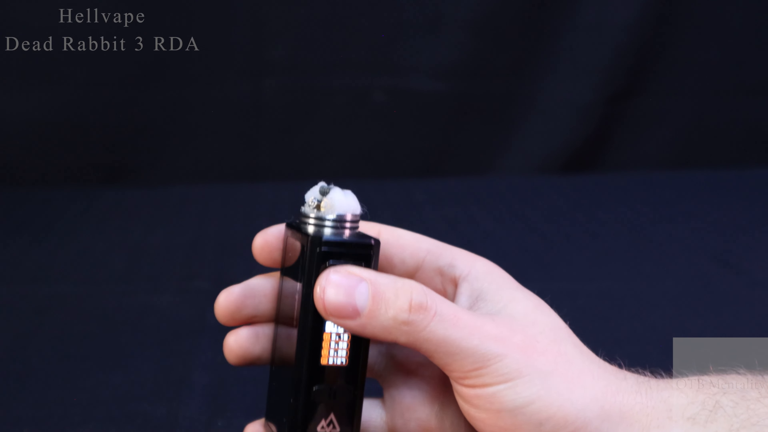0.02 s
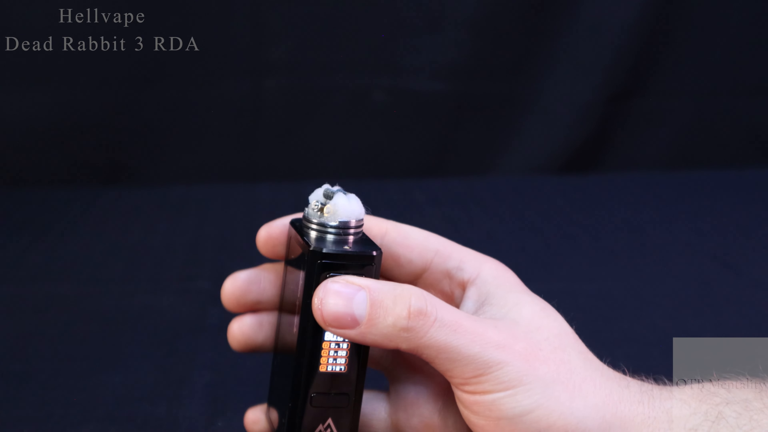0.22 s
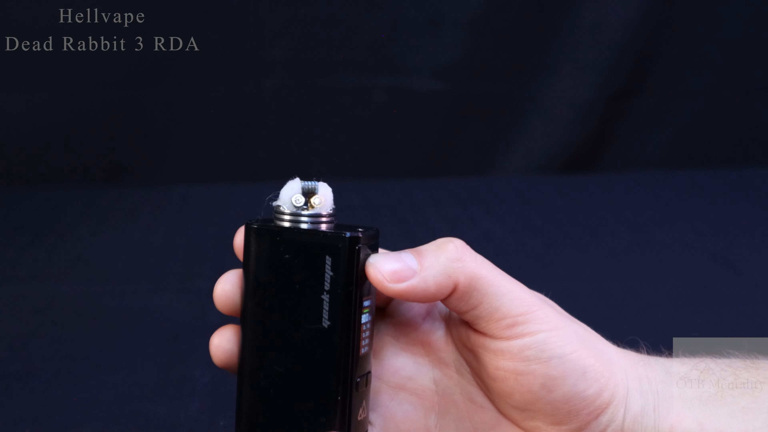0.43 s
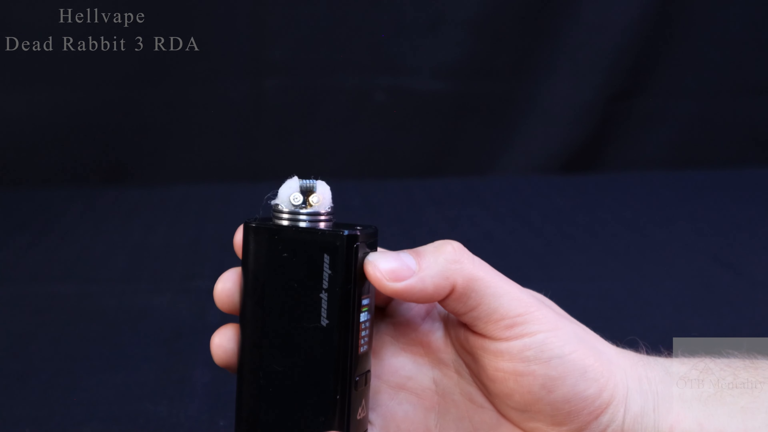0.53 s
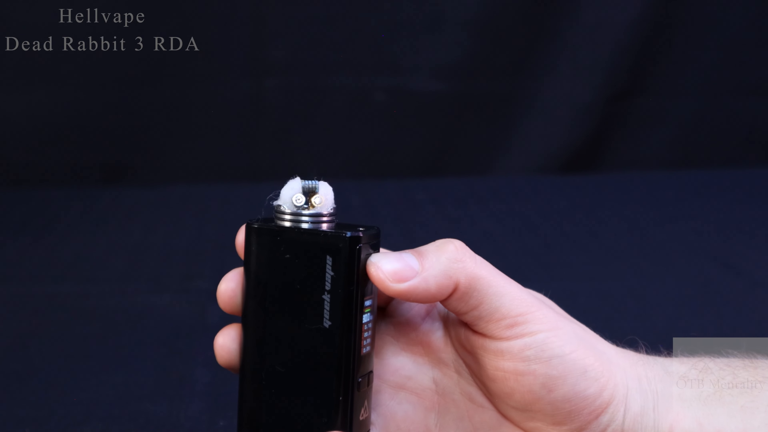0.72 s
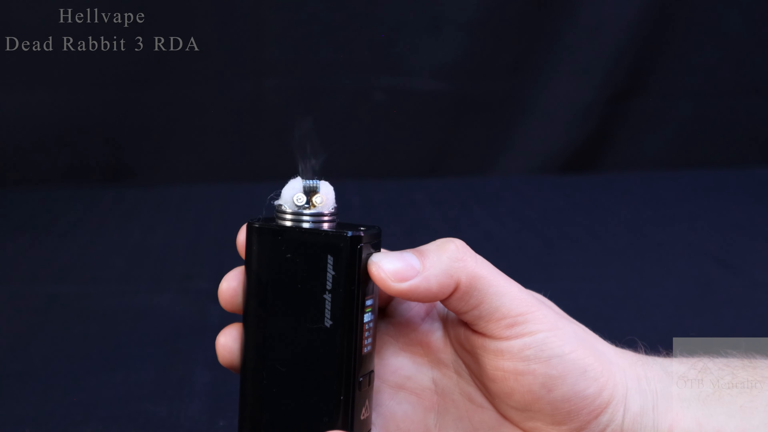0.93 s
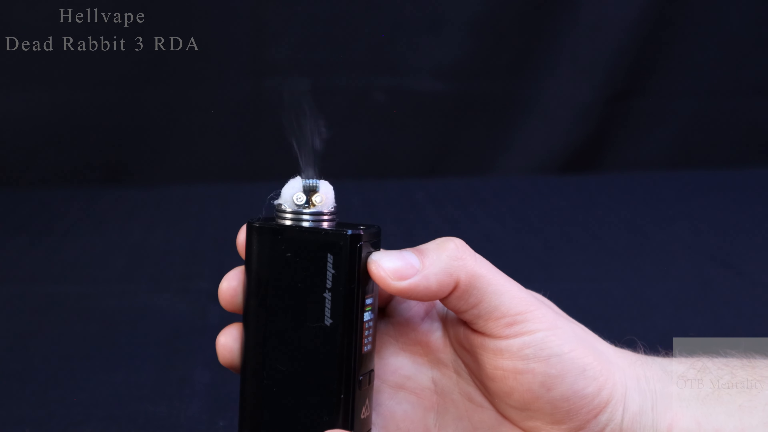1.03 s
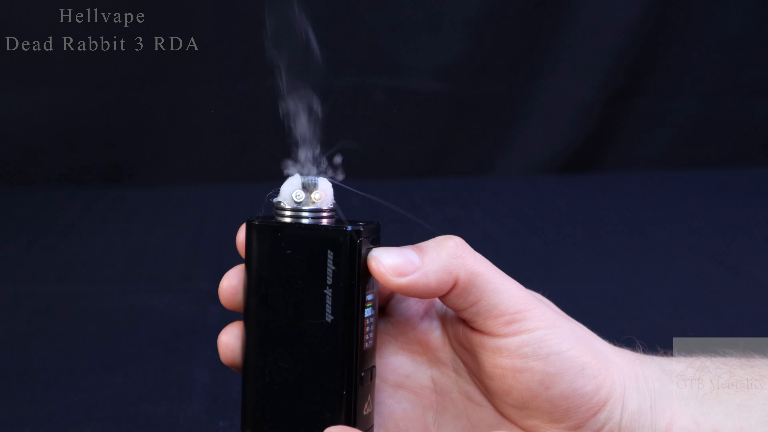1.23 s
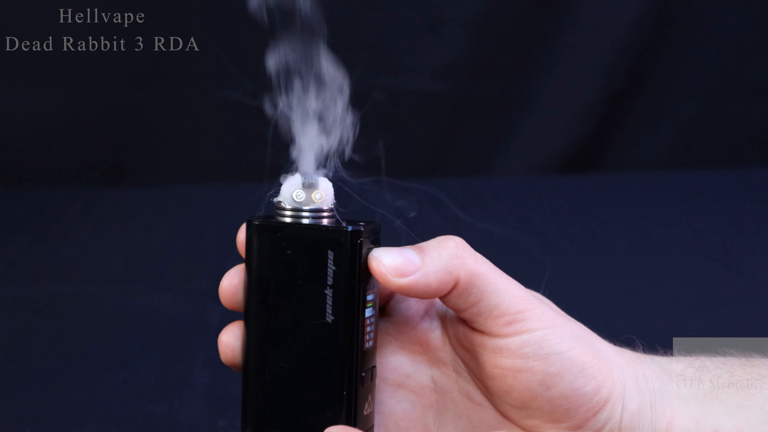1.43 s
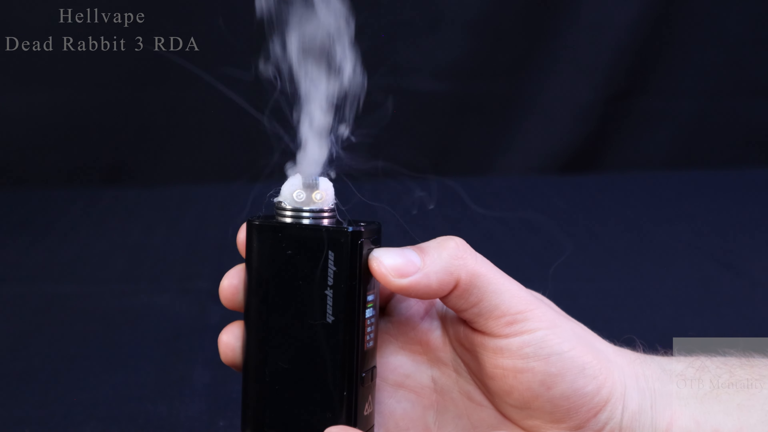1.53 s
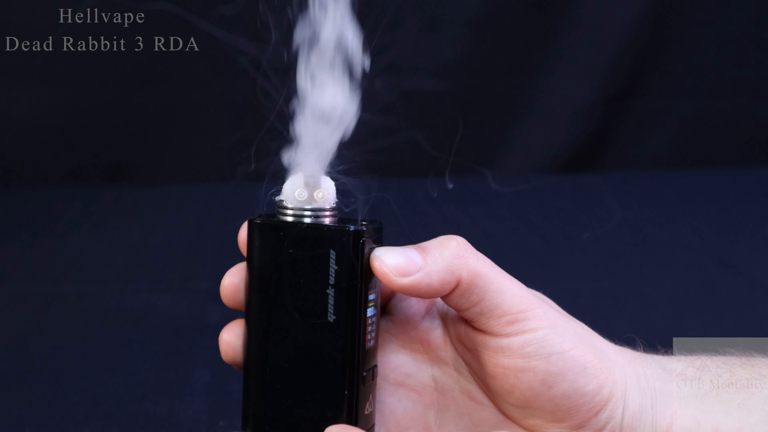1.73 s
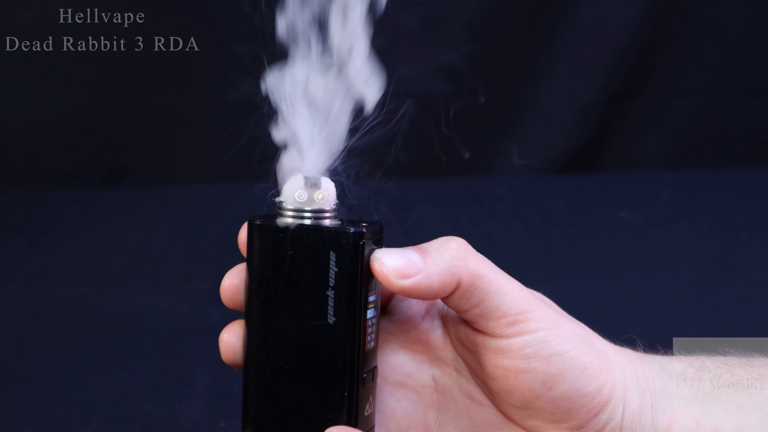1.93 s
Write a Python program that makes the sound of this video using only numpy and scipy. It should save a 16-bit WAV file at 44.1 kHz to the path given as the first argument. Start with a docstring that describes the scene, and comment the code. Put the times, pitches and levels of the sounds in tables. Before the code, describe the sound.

A vaping device's wet coils sizzle, close-miked in a quiet room. Dull, low handling thumps come in the first 0.3 seconds, strongest near 0.2, with faint skin rubbing. At 0.48 a tiny double button click sounds with a soft bump. A very faint, high simmer follows, rising into sizzle from 0.8, thickening after 1.15 and becoming a fuller, bright, boiling hiss until 2.0. Faint low rumble lies underneath.

```python
"""Vaping device handled and fired close to a microphone

Four overlapping swarms of coloured bubble pops step the wet coils from simmer through sizzle and seethe to boil.
Before that the hand gives damped low thumps and a noise rub; two short filtered bursts click the fire button.
A slow sine flutter, grip rumble and steady room noise lie underneath.
"""
import sys
import numpy as np
from scipy import signal
from scipy.fft import rfft, irfft
from scipy.io import wavfile
from scipy.ndimage import uniform_filter1d

SR = 44100
rng = np.random.default_rng(int(sys.argv[2]) if len(sys.argv) > 2 else 0)


def bounce(signal):
    """Save signal as a 16-bit WAV file at the path given by the first command-line argument."""
    frames = np.transpose(np.atleast_2d(signal))
    limited = np.clip(frames, -1, 1)
    pcm = np.round(limited * 32767).astype(np.int16)
    wavfile.write(sys.argv[1], SR, pcm)


N = 88200
T = np.arange(N) / SR


def undb(db):
    """Decibels to gain."""
    return 10 ** (np.asarray(db) / 20)


def unit(x):
    """Scale to rms 1."""
    return x / np.sqrt(np.mean(x ** 2) + 1e-20)


def curve(rows):
    """Gain over time from (t/s, level/dB) points."""
    return undb(np.interp(T, *np.array(rows).T))


def colour(x, points):
    """Minimum-phase filter through (f/Hz, level/dB) points, 30 dB/octave down outside them, floor -80 dB."""
    hz, db = np.array(points).T
    octave = np.log2(np.maximum(np.fft.rfftfreq(2 * N, 1 / SR), 1))
    edge = np.log2(np.sort(hz))
    outside = np.maximum(edge[0] - octave, 0) + np.maximum(octave - edge[-1], 0)
    shape_db = np.maximum(np.interp(octave, edge, db) - 30 * outside, -80)
    # fold the cepstrum onto positive time: causal response
    cepstrum = irfft(np.log(undb(shape_db)))
    cepstrum[1:N] *= 2
    cepstrum[N + 1:] = 0
    response = np.exp(rfft(cepstrum))
    return irfft(rfft(x, 2 * N) * response)[:N]


def noise(points):
    """Coloured Gaussian noise of rms 1."""
    return unit(colour(rng.standard_normal(N), points))


def walk(rate_hz):
    """Random steps at rate_hz, smoothed twice, rms 1."""
    k = int(SR / rate_hz)
    steps = np.repeat(rng.standard_normal(N // k + 1), k)
    return unit(uniform_filter1d(uniform_filter1d(steps, k), k)[:N])


def ramp(u):
    """Smooth step from 0 to 1."""
    return np.sin(np.pi / 2 * np.clip(u, 0, 1)) ** 2


# boiling stages: start t/s, takeover/s, level at end of takeover/dB, pop rate/(1/s), size spread/dB
STAGES = [(0.48, 0.11, -69, 13000, 2), (0.80, 0.25, -59.5, 10700, 3), (1.14, 0.32, -52, 15000, 2.6),
          (1.46, 0.29, -50, 14600, 2)]
# stage spectra: f/Hz, relative density/(dB per Hz)
SIMMER_COLOUR = [(6800, -14.5), (7900, -5), (9000, -4.5), (10200, -4), (10900, -10), (12600, -9),
                 (14100, -14), (15000, -12), (15700, -5)]
SIZZLE_COLOUR = [(1300, -14), (2300, -10.5), (2850, -17.5), (3600, -5), (4800, -10), (5700, -5.5),
                 (6800, -7.5), (7600, 1), (8500, 1.5), (9000, -3.5), (9800, -2.5), (10700, -7), (13500, -6),
                 (14400, -10.5), (15000, -6), (15700, -6.5)]
SEETHE_COLOUR = [(300, -10.5), (1000, -14), (2000, -7), (2950, -14.5), (3600, -7.5), (4800, -13),
                 (5800, -6.5), (6800, -10), (7700, -1), (8500, 0), (8950, -6), (9700, -2.5), (10300, -5.5),
                 (10700, -10.5), (13000, -8.5), (14200, -15), (15700, -10.5)]
BOIL_COLOUR = [(300, -7.5), (900, -10.5), (1200, -6.5), (2000, -2.5), (3000, -11), (3550, -1.5),
               (4800, -9.5), (5900, -3), (6700, -7), (7800, 2), (8500, 0), (8950, -2.5), (9600, -2.5),
               (10300, -5), (10700, -9), (12900, -8), (14200, -13), (15700, -13.5)]
# brief boosts of the boiling: t/s, width/s, boost/dB
SPURTS = [(0.99, 0.02, 1.5), (1.014, 0.0041, 4), (1.975, 0.053, 0.5)]
GROWTH_DB_PER_S = 8
FLICKER_DB, FLICKER_HZ = 0.06, 25.5


def coils():
    """Bubbles burst as random-sign impulses; each hotter stage takes over, louder, with its own spectrum."""
    out = np.zeros(N)
    colours = (SIMMER_COLOUR, SIZZLE_COLOUR, SEETHE_COLOUR, BOIL_COLOUR)
    reached = [ramp((T - start) / takeover) for start, takeover, *_ in STAGES] + [0]
    for k, points in enumerate(colours):
        start, takeover, db, pops_per_s, spread_db = STAGES[k]
        share = np.sqrt(reached[k] * (1 - reached[k + 1]))
        sizes = undb(spread_db * np.minimum(rng.exponential(size=N), 6))
        bursts = rng.random(N) < pops_per_s / SR
        pops = bursts * sizes * rng.choice([-1, 1], N)
        level = undb(db + GROWTH_DB_PER_S * (T - start - takeover))
        out += level * share * unit(colour(pops, points))
    spurts_db = sum(db * np.exp(-((T - at) / width) ** 2) for at, width, db in SPURTS)
    return out * undb(spurts_db + FLICKER_DB * walk(FLICKER_HZ))


REFLECTION_DB, REFLECTION_DECAY_S, REFLECTION_DELAY_S = -8, 0.011, 0.0037


def reflect(x):
    """Table and walls return a short, decaying random scatter of echoes that combs the hiss."""
    age = T[:N // 16]
    echoes = rng.standard_normal(len(age)) * np.exp(-age / REFLECTION_DECAY_S) * (age > REFLECTION_DELAY_S)
    echoes /= np.linalg.norm(echoes)
    return x + undb(REFLECTION_DB) * signal.fftconvolve(x, echoes)[:N]


# handling thumps: t/s, f/Hz, level/dB, attack/s, hold/s, decay time/s, scuff share
THUMPS = [(0.042, 76.4, -26, 0.01, 0.0012, 0.011, 0.21), (0.078, 32.2, -38.5, 0.0042, 0.051, .02, 0.12),
          (0.136, 94, -39.5, 0.014, 0.0079, 0.0072, 0.55),
          (0.183, 125.5, -25.5, 0.0096, 0.0014, 0.0074, .08),
          (0.2029, 63.7, -11, .008, 0.0043, .026, 0.037), (0.265, 89.7, -39.5, 0.0056, 0.064, 0.016, 0.37),
          (0.4807, 82, -34.5, 0.0094, 0.0037, 0.0051, 0.35), (0.503, 142, -51, .008, 0.017, 0.042, 0.42),
          (0.514, 86.6, -48, 0.0078, 0.069, 0.043, 0.28)]
# overtones: multiple of f, level re fundamental/dB
THUMP_OVERTONES = [(2.93, -39), (5.9, -52.5)]
# scuff spectrum: f/Hz, relative density/(dB per Hz)
SCUFF_COLOUR = [(20, -5), (60, 4), (120, 9), (165, -2), (205, -18.5), (250, -46)]
THUMP_DAMPED_S = 0.055  # after the hold; fade-out fills the second half


def thumps():
    """Each bump of the hand starts a low, scuffed ring that the grip soon damps."""
    out = np.zeros(N)
    scuff = noise(SCUFF_COLOUR)
    for start, hz, db, attack, hold, decay, rough in THUMPS:
        age = np.maximum(T - start, 0)
        late = np.maximum(age - attack - hold, 0)
        grip = 1 - ramp(2 * late / THUMP_DAMPED_S - 1)
        env = ramp(age / attack) * np.exp(-late / decay) * grip
        phase = 2 * np.pi * hz * age
        overtones = sum(undb(part_db) * np.sin(multiple * phase) for multiple, part_db in THUMP_OVERTONES)
        out -= undb(db) * env * (np.sin(phase) + overtones + rough * scuff)
    return out


# button clicks: t/s, total energy level/dB
CLICKS = [(0.4748, -28.5), (0.4775, -29.5)]
# click spectrum: f/Hz, relative density/(dB per Hz)
CLICK_COLOUR = [(250, -6), (500, 2.5), (1000, 1.5), (1400, 0.5), (2400, -5), (2950, -11), (3500, -4),
                (4200, -9), (5500, -17), (6100, -23), (6800, -16), (9000, -22), (15000, -33)]
CLICK_RING_S, CLICK_RING_DB = 0.0013, 3.5  # levels re the impulse, before colouring
ECHO_DELAY_S, ECHO_DECAY_S, ECHO_DB = 0.0048, 0.06, 2


def noise_burst(start, decay):
    """Exponentially decaying noise of unit energy."""
    burst = rng.standard_normal(N) * (T >= start) * np.exp(-np.maximum(T - start, 0) / decay)
    return unit(burst) / np.sqrt(N)


def button():
    """The switch snaps and seats: impulse, short case ring, delayed room tail."""
    out = np.zeros(N)
    for start, db in CLICKS:
        ring = undb(CLICK_RING_DB) * noise_burst(start, CLICK_RING_S)
        echo = undb(ECHO_DB) * noise_burst(start + ECHO_DELAY_S, ECHO_DECAY_S)
        snap = ring + echo
        snap[int(start * SR)] += 1
        out += undb(db) * unit(colour(snap, CLICK_COLOUR)) / np.sqrt(N)
    return out


# case modes: f/Hz, level/dB, decay time/s
CASE_MODES = [(600, -44.5, 0.0013), (980, -46.5, 0.0026), (1340, -43.5, 0.0018), (1900, -57, 0.0032),
              (2300, -48.5, 0.0019), (3420, -47.5, 0.0022), (3750, -53, 0.0032), (5200, -55, 0.00056)]


def case_ring():
    """The first snap of the button excites decaying sine modes of the case."""
    age = np.maximum(T - CLICKS[0][0], 0)
    return sum(undb(db) * np.exp(-age / decay) * np.sin(2 * np.pi * hz * age) for hz, db, decay in CASE_MODES)


# skin rub: t/s, level/dB
RUB = [(0, -62.5), (0.07, -69), (0.125, -63.5), (0.23, -68), (0.33, -76.5)]
# rub spectrum: f/Hz, relative density/(dB per Hz)
RUB_COLOUR = [(240, -35), (400, -10), (531, -4.5), (683, -22), (736, -11.5), (1050, -11), (1620, -12),
              (2280, -11), (3410, -19.5), (3780, -15.5), (4800, -24), (14000, -31)]
RUB_RELEASE_S = 0.04


def rub():
    """Skin on the case: coloured noise, decaying exponentially after the last level point."""
    release = np.exp(-np.maximum(T - RUB[-1][0], 0) / RUB_RELEASE_S)
    return curve(RUB) * release * noise(RUB_COLOUR)


# grip rumble: t/s, level/dB
RUMBLE = [(0, -44.5), (0.4, -55), (0.65, -53), (0.78, -54.5), (1.0, -59), (1.25, -54), (1.6, -57.5),
          (1.8, -56), (2.0, -58.5)]
# rumble spectrum: f/Hz, relative density/(dB per Hz)
RUMBLE_COLOUR = [(11, -21.5), (18, -0.5), (29, -6.5), (43, -11), (102, -13.5), (119, -31), (144, -15),
                 (168, -27.5), (260, -41.5), (340, -33), (570, -120)]


def grip_rumble():
    """The grip keeps up a faint low-frequency noise."""
    return curve(RUMBLE) * noise(RUMBLE_COLOUR)


# low flutter: t/s, rms level/dB
FLUTTER = [(0.9, -73), (1.082, -52), (1.224, -60), (1.35, -45.5), (1.514, -45), (1.94, -51), (2.0, -51)]
FLUTTER_HZ, FLUTTER_WANDER, FLUTTER_WANDER_HZ = 18, 0.019, 5.4  # wander: rms fraction of pitch


def flutter():
    """Sine at the bottom of hearing, its frequency wandering slightly."""
    hz = FLUTTER_HZ * (1 + FLUTTER_WANDER * walk(FLUTTER_WANDER_HZ))
    phase = 2 * np.pi * np.cumsum(hz) / SR
    return curve(FLUTTER) * np.sqrt(2) * np.sin(phase)


# room spectrum: f/Hz, relative density/(dB per Hz)
ROOM_COLOUR = [(120, -36.5), (200, -8.5), (961, -19.5), (1050, -20.5), (1150, -21.5), (1850, -22.5),
               (2390, -25.5), (4710, -28.5), (5250, -28.5), (15700, -32.5)]
ROOM_DB = -69.5


def room():
    """Quiet room: steady coloured noise."""
    return undb(ROOM_DB) * noise(ROOM_COLOUR)


def scene():
    """Coils, hand and button over flutter and room; one channel."""
    device = reflect(coils()) + button() + case_ring()
    hand = thumps() + rub() + grip_rumble()
    return (device + hand + flutter() + room())[None]


TOP_HZ = 15700


def record(dry):
    """The recorder cuts the top with a steep elliptic low-pass."""
    lowpass = signal.ellip(12, 0.1, 90, TOP_HZ, fs=SR, output="sos")
    return signal.sosfilt(lowpass, dry)


dry = scene()
out = record(dry)
bounce(out)
```